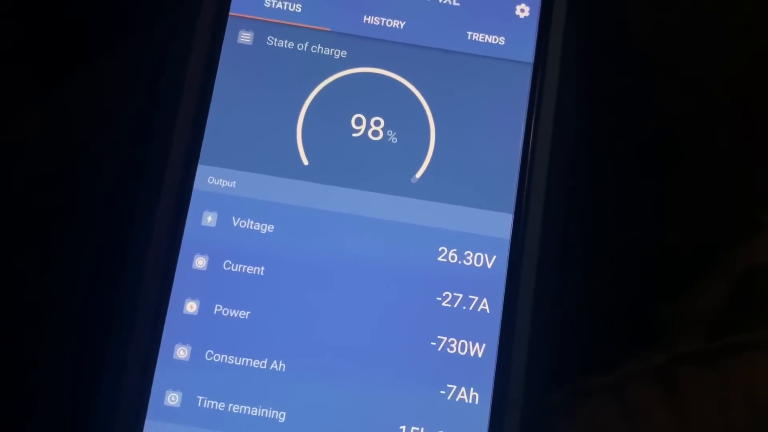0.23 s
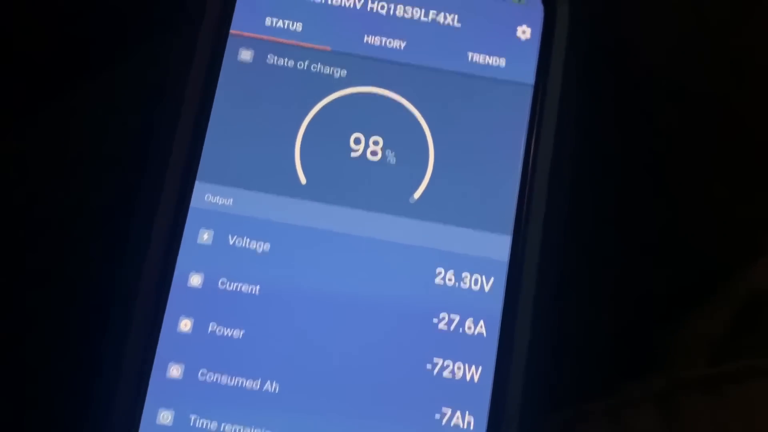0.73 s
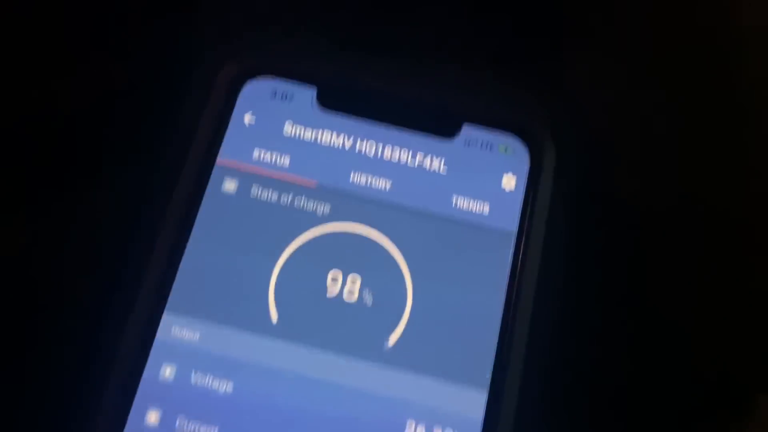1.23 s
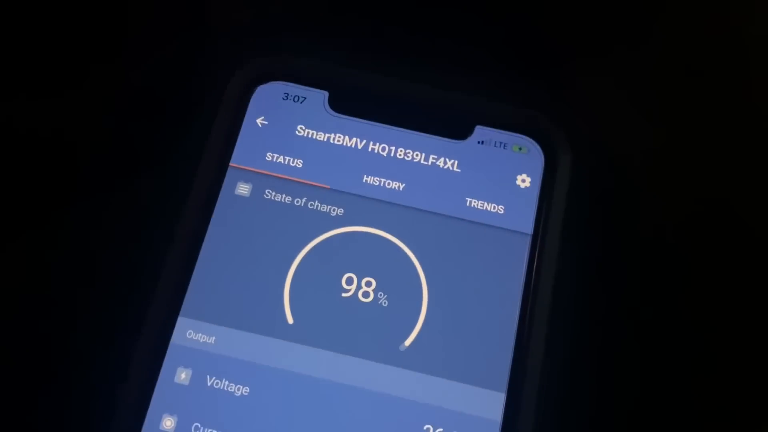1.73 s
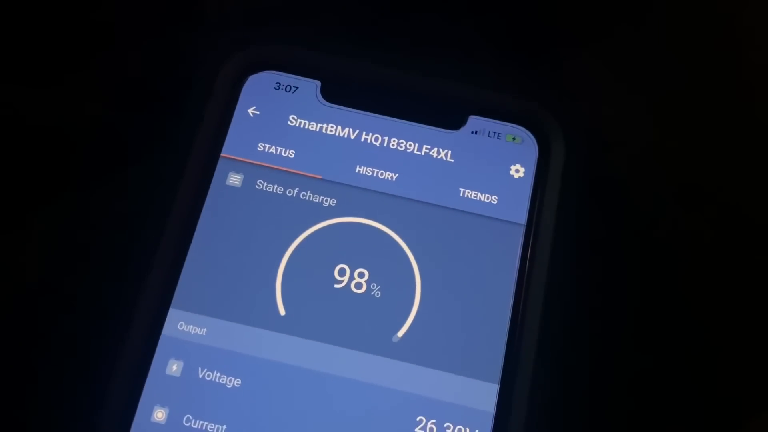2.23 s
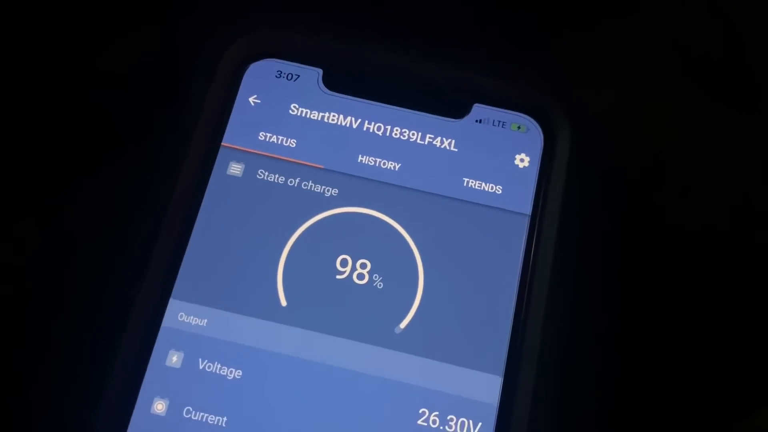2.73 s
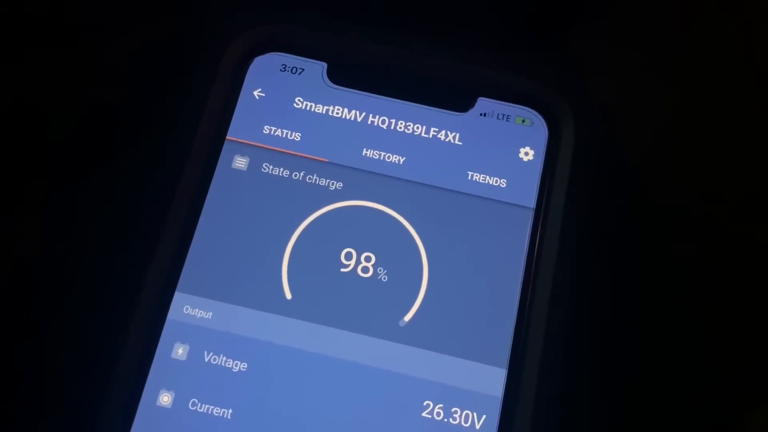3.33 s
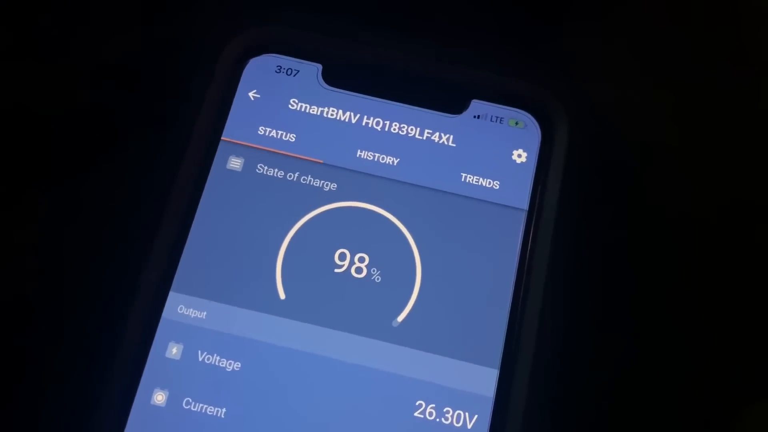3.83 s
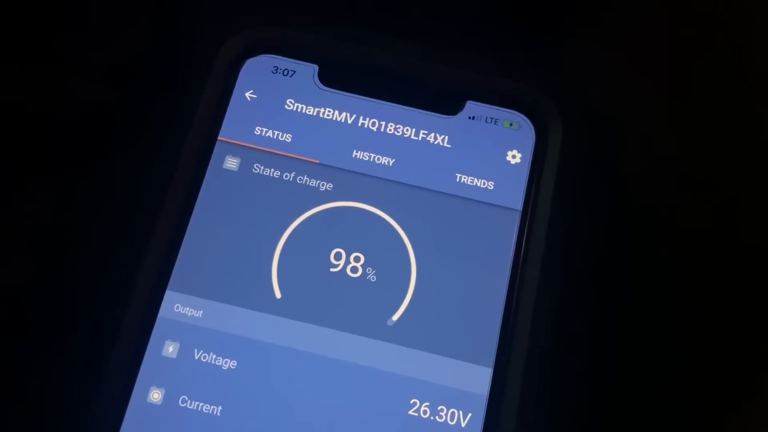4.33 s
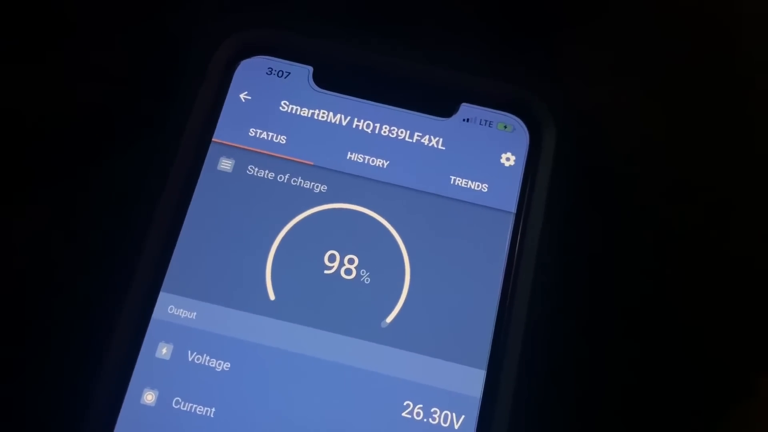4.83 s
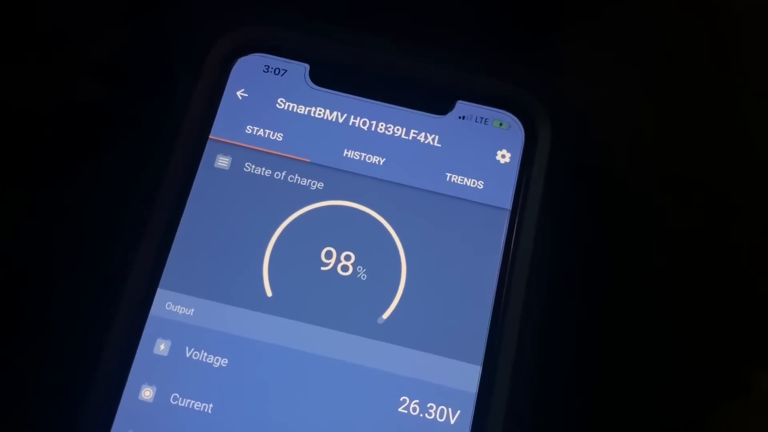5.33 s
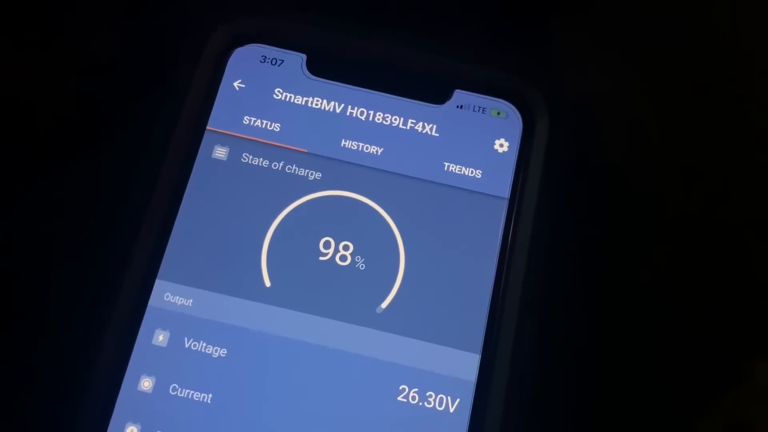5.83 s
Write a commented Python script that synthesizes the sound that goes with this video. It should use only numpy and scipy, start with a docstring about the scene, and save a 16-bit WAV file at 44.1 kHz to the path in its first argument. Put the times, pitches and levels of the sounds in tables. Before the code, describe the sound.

Inside a parked vehicle at night, a rooftop air conditioner holds a steady deep hum with a rumbling blower and soft air rushing from ceiling vents. Around one second, fingers brush a phone case and a light tick is followed by a quick triple click, with faint thin whistles and hiss. Later come tiny high ticks and soft rustles near five seconds. The handheld stereo microphone is close to the hand.

```python
"""A rooftop air conditioner runs steadily above a parked vehicle: tones summed from shaft and mains multiples
stand in shaped blower noise, and duct-coloured noise rushes from the ceiling vents.
Around the first second a hand shifts on a phone: hiss, thin gliding whistles, brushing noise, and a tick and
triple click of noise bursts and ringing modes. Between four and six seconds come two tiny high ticks,
soft rustles of band noise, and one more faint scrape."""
import sys
import numpy as np
from scipy import signal
from scipy.fft import rfft, irfft
from scipy.io import wavfile

SR = 44100
rng = np.random.default_rng(int(sys.argv[2]) if len(sys.argv) > 2 else 0)


def put_to_file(sound):
    """Save the sound as 16-bit audio at rate SR, in the file named by the first command-line argument."""
    columns = np.atleast_2d(sound).T  # one column per channel
    safe = np.clip(columns, -1, 1)
    whole_steps = np.round(safe * 32767)
    wavfile.write(sys.argv[1], SR, whole_steps.astype(np.int16))


N = 267687
T, HZ = np.arange(N) / SR, np.fft.rfftfreq(N, 1 / SR)  # time in s, spectrum frequencies in Hz

# phase between the two microphone ports: [f/Hz, lead of the left/rad]
PORT_LEAD = [(250, 0), (370, -.35), (460, -1.5), (820, -1.55), (925, -.9), (1020, -1.45), (1300, -1.8),
             (1450, -3.6), (1580, -5.4), (1670, -3.6), (1750, -3.7), (1840, -1.7), (1950, -3.2),
             (2200, -3.5), (2300, -4.5), (2550, -5.2), (2850, -4.6), (2980, -2.8), (3450, 0), (3700, .5),
             (4000, -.4), (4600, -.9), (12000, 0)]


def machine(slip_cycles=.004, waver_db=1.0):
    """Rotating machinery and magnetic hum: lines at sums of shaft and mains multiples, sidebands included."""
    shaft_hz, mains_hz = 58.23, 60.005
    # tones: [multiple of the shaft rate, multiple of the mains rate, level/dB, left minus right/dB]
    tones = [(1, 0, -39.5, 1), (2, 0, -52, 0.5), (0, 2, -38.5, 1), (-1, 4, -57, 1), (0, 4, -46.5, 1),
             (1, 4, -58, 2), (0, 6, -67, 7.5), (12, 0, -69.5, -2.6), (16, 0, -78.5, -2), (18, 0, -74, -2)]
    shaft_turns = shaft_hz * T + slip_cycles * drift(1.0)  # the load nudges the rotor
    out = np.zeros((2, N))
    for shaft_order, mains_order, db, side_db in tones:
        k, m = round(shaft_order), round(mains_order)
        tone_hz = abs(k * shaft_hz + m * mains_hz)
        lag = np.array([[0], [read(PORT_LEAD, tone_hz)]])
        phase = 2 * np.pi * (k * shaft_turns + m * mains_hz * T + rng.random())
        level = amp(db + waver_db * drift(3.0))
        out += panned(side_db) * level * np.sqrt(2) * np.sin(phase - lag)
    return out


def blower(blade_hz=149.1, blade_db=-55, phase_wander_rad=0.25):
    """Turbulence gives a broadband rumble; the blades add a weak tone with wandering phase."""
    # rumble through the roof: [f/Hz, density/dB per Hz]
    rumble = [(22, -85), (27, -64.5), (40, -62), (55, -58), (63, -60), (88, -61), (102, -54), (120, -55.5),
              (148, -57.5), (182, -66), (218, -63), (255, -69), (305, -71.5), (420, -88)]
    blades = np.sqrt(2) * np.sin(2 * np.pi * blade_hz * T + phase_wander_rad * drift(1.0))
    roof_loss_db = 40 * np.log10(np.maximum(HZ / rumble[-1][0], 1))  # above the last table frequency
    return airborne(read(rumble) - roof_loss_db) + amp(blade_db) * blades


def vents(flutter_db=0.46, patchy_db=1.16):
    """Flow noise filtered by resonances: it flutters as a whole, and eddies stir single bands."""
    # air rushing from the vents: [f/Hz, density/dB per Hz]
    rush = [(200, -92.5), (380, -80.5), (560, -81.5), (800, -91.5), (1200, -96.5), (1650, -93),
            (2300, -100), (3400, -104.5), (4300, -116), (5200, -120.5), (7000, -122), (9700, -127),
            (12000, -124.5), (14300, -127), (15200, -133)]
    # resonances of duct and cabin that colour the air: [f/Hz, width/Hz, lift/dB]
    duct = [(452, 40, 2), (468, 25, -1.5), (543, 36, 3), (600, 41, -4.5), (641, 32, 4.5), (743, 20, 3),
            (786, 30, 2), (880, 56, -2), (936, 31, 3), (976, 35, 4), (1055, 33, 3), (1150, 40, 1.5),
            (1220, 61, 2), (1380, 37, 2.5), (1420, 53, 4.5), (1495, 23, -2), (1573, 46, 3), (1680, 68, 2.5),
            (1825, 70, 4.5), (1925, 30, -2.5), (2004, 68, 3.5), (2165, 100, 2.5), (2275, 55, -4.5),
            (2350, 170, 0.5), (2800, 72, -3), (3200, 82, 3.5), (3400, 90, 1.5), (3280, 120, -4),
            (3790, 220, -3.5), (3930, 190, 4), (4440, 200, -2), (6370, 350, 4), (6350, 200, -1.5)]
    lift_db = sum(db / (1 + (2 * (HZ - hz) / width_hz) ** 4) for hz, width_hz, db in duct)
    spectrum = rfft(airborne(read(rush) + lift_db))
    stirred = np.zeros((2, N))
    for shape, eddy in patches():
        stirred += irfft(spectrum * shape, N) * amp(patchy_db * eddy)
    return stirred * amp(flutter_db * drift(35.0))


def patches(patch_hz=500, rate_hz=14, count=8):
    """Independent modulation by band, with steady treble above: yields (band shape, drift)."""
    place = HZ / patch_hz
    for k in range(count):
        yield np.maximum(1 - abs(place - k), 0), drift(rate_hz)  # overlapping triangles
    yield np.clip(place - count + 1, 0, 1), 0


def clicks(crack_db=14, cabin_db=-6.0, cabin_t60=0.15, ping_right_db=-18):
    """Impact excitation: a crack and rattle make snap and knock, ring body and edge; the cabin adds a tail."""
    # clicks of the phone in the hand:
    # [t/s, level/dB, rattle t60/s, knock against the snap/dB, body ring level/dB, edge ping level/dB]
    impacts = [(0.8198, -62.5, 0.0045, 11.5, -55, -55), (1.0567, -52, 0.008, 4, -37.5, -51),
               (1.0647, -59, 0.01, -1, -49.5, -47), (1.07, -52, 0.0126, -7, -50, -51)]
    # colour of the bright snap: [f/Hz, level/dB]
    snap_colour = [(1000, 2), (2500, -4), (3300, -3), (3800, 0.5), (4600, 7), (5500, -9), (6500, 0.5),
                   (9000, -10.5), (11000, -24), (13000, -30.5)]
    # colour of the dull knock: [f/Hz, level/dB]
    knock_colour = [(150, -0.5), (450, 10), (950, 0), (1700, 3), (2200, -2), (3000, -19.5), (5000, -27),
                    (8000, -37.5), (12000, -53)]
    # balance of snap and knock: [f/Hz, left minus right/dB]
    balance = [(2000, 1), (4500, 2), (7000, 0.5), (10000, 2), (13000, 1)]
    # modes of the phone's body: [f/Hz, level/dB, t60/s]
    body = [(300, 3, 0.04), (453, 0, 0.022), (850, -3.5, 0.018), (1070, -7, .012), (1510, -9, 0.01),
            (2150, -16, .01), (3220, -13, 0.0046), (4650, -19.5, .014)]
    # modes of the case edge, by the left port: [f/Hz, level/dB, t60/s]
    case_edge = [(8100, -2, .025), (8340, -1.5, .015), (8750, 1.5, 0.01)]
    snaps, knocks = np.zeros((2, 2, N))
    for s, db, t60, knock_db, *_ in impacts:
        blow = rng.standard_normal((2, N)) * dying(s, t60)
        blow[:, round(s * SR)] = amp(crack_db)
        snaps += amp(db) * blow
        knocks += amp(db + knock_db) * blow[0]  # the same in both ports
    bursts = causal(snaps, snap_colour) + causal(knocks, knock_colour)
    out = irfft(rfft(bursts) * panned(read(balance)), N)
    out += struck(body, [(s, body_db) for s, *_, body_db, _ in impacts])
    pings = struck(case_edge, [(s, ping_db) for s, *_, ping_db in impacts])
    out += pings * amp([[0], [ping_right_db]])
    t = T[:SR // 2]
    tail = rng.standard_normal((2, len(t))) * np.exp(-np.log(1000) * t / cabin_t60)
    tail /= np.linalg.norm(tail[0])
    return out + amp(cabin_db) * signal.fftconvolve(out, tail, axes=1)[:, :N]


def brush(peak_s=1.066, level_db=-63.5, attack_s=0.12, release_s=0.5, grain_db=2):
    """Friction noise of fingers on the case around the clicks, with a fine random grain of level."""
    # colour of the brushing: [f/Hz, level/dB]
    friction = [(800, -10.5), (1600, 1.5), (3000, -2.5), (4500, 1.5), (5400, -9), (6500, -5.5), (8000, -17),
                (14000, -21)]
    noise = coloured(rng.standard_normal((2, N)), friction)
    return noise * amp(level_db + grain_db * drift(250)) * swell(peak_s, attack_s, release_s)


def whistles(fuzz_hz=70, wobble_hz=110):
    """Frequency modulation: each tone arches and wobbles in pitch as it swells and fades in hazy noise."""
    # thin whistles: [t of the pitch crest/s, attack/s, release/s, top f/Hz, level/dB, haze against the tone/dB]
    arches = [(.41, 0.65, .9, 14250, -69, -5.5), (.87, .3, .7, 12600, -89, 8),
              (1.14, .25, 0.49, 14350, -84.5, -2.5)]
    # colour of the haze: [f/Hz, level/dB]
    haze_colour = [(9000, -41), (11500, -11), (13000, 1), (14200, 1), (15000, -9)]
    rise_hz_per_s, fall_hz_per_s = 12000, 8000  # slopes far from the crest
    crest_s, swell_lag_s = 0.073, 0.048  # rounding of the crest; loudness peaks just after it
    haze_spread = 2  # the haze rises and falls this many times more slowly than its whistle
    out = np.zeros(N)
    for s, attack_s, release_s, top_hz, db, haze_db in arches:
        slope = np.where(T < s, rise_hz_per_s, fall_hz_per_s)
        arch = top_hz - slope * (np.hypot(T - s, crest_s) - crest_s)
        pitch = np.maximum(arch + fuzz_hz * drift(500) + wobble_hz * drift(18), 0)
        peak_s = s + swell_lag_s
        tone = np.sin(2 * np.pi * np.cumsum(pitch) / SR) * swell(peak_s, attack_s, release_s)
        haze = coloured(rng.standard_normal(N), haze_colour)
        haze *= swell(peak_s, haze_spread * attack_s, haze_spread * release_s)
        out += amp(db) * (tone + amp(haze_db) * haze)
    return out


def hiss(level_db=-84.5, end_s=1.2, release_s=.5, side_db=11):
    """Stationary noise, stronger at left, holds while the hand shifts, then decays exponentially."""
    # colour of the hiss: [f/Hz, level/dB]
    colour = [(5000, -24.5), (7750, -15), (8100, 11), (8900, 2.5), (9700, -7.5), (10500, -18),
              (14000, -8.5), (15000, -15.5)]
    noise = coloured(rng.standard_normal((2, N)), colour) * panned(side_db)
    return noise * amp(level_db) * np.exp(-np.log(1000) * np.maximum(T - end_s, 0) / release_s)


def rustle(grain_db=0.6, side_db=4.5):
    """Friction of the grip: swelling bands of noise with a shared grain of level, stronger at left."""
    # soft rustles and scrapes: [t of the peak/s, attack/s, release/s, centre f/Hz, width/Hz, level/dB]
    scrapes = [(5.087, .02, 0.086, 2670, 1000, -65), (5.12, .12, 0.45, 5300, 1600, -76.5),
               (5.15, 0.32, 1.0, 2750, 1293, -68), (5.175, .3, .85, 3230, 486, -66.5),
               (5.735, .45, .3, 3230, 1100, -70)]
    swish = np.zeros((2, N))
    for s, attack_s, release_s, hz, width_hz, db in scrapes:
        swish += amp(db) * swell(s, attack_s, release_s) * band(hz, width_hz)
    return swish * amp(grain_db * drift(120)) * panned(side_db)


def ticks(centre_hz=13000, width_hz=2400, attack_s=.004, release_s=.1):
    """Short bursts of narrow-band noise: tiny high ticks of the grip, the same in both ports."""
    # faint high ticks: [t/s, level/dB]
    taps = [(4.377, -83), (5.085, -74)]
    envelope = sum(amp(db) * swell(s, attack_s, release_s) for s, db in taps)
    return band(centre_hz, width_hz)[0] * envelope


def airborne(density_db):
    """Partial coherence: noise of a given density, alike at two ports in the bass, less so in the treble."""
    # likeness of the ports: [f/Hz, coherence 0-1]
    likeness = [(250, .99), (340, .88), (415, .6), (530, .93), (600, .74), (680, .96), (800, .82),
                (900, .58), (1040, .92), (1250, .84), (1330, .4), (1500, .6), (1650, .4), (2000, .52),
                (2400, .66), (2650, .55), (2760, .25), (2920, .62), (3200, .35), (3650, .68), (4400, .58),
                (5000, .35), (9000, .1)]
    # balance of the ports: [f/Hz, left minus right/dB]
    tilt = [(250, 0), (380, 1.6), (500, -.8), (900, -1.8), (1300, 0.5), (1500, 1.2), (1650, -1.1),
            (1850, 2), (2220, 3), (2450, 0), (3400, 2.2), (4600, 1), (7000, 1.5), (12000, 0)]
    a, b = rfft(rng.standard_normal((2, N)))
    same = np.clip(read(likeness), 0, .984)
    right = (same * a + np.sqrt(1 - same ** 2) * b) * np.exp(-1j * read(PORT_LEAD))
    pair = np.array([a, right])
    return irfft(pair * panned(read(tilt)) * amp(density_db) * np.sqrt(SR / 2), N)


def struck(modes, hits):
    """Modal superposition: decaying sines ring once for each hit (s, level dB)."""
    out, t = np.zeros(N), T[:SR // 10]
    ring = sum(amp(db - 60 * t / t60) * np.sin(2 * np.pi * hz * t) for hz, db, t60 in modes)
    for s, db in hits:
        out[round(s * SR):][:len(t)] += amp(db) * ring
    return out


def band(hz, width_hz):
    """Resonant filtering: noise of unit rms in one broad band, independent in the two ports."""
    shape = 1 / (1 + (2 * (HZ - hz) / width_hz) ** 4)
    return evened(irfft(rfft(rng.standard_normal((2, N))) * shape, N))


def coloured(x, points):
    """Spectral shaping without phase shift, keeping the power of white noise."""
    return irfft(rfft(x) * evened(amp(read(points))), N)


def causal(x, points):
    """Minimum-phase filtering: no ringing ahead of the event, and the power of white noise is kept."""
    log_gain = np.log(evened(amp(read(points, abs(np.fft.fftfreq(N, 1 / SR))))))
    response = np.exp(np.conj(signal.hilbert(log_gain)))  # phase follows from the log gain
    return irfft(rfft(x) * response[:len(HZ)], N)


def drift(rate_hz):
    """Low-passed random fluctuation of unit rms, up to about the given rate."""
    return evened(irfft(rfft(rng.standard_normal(N)) * np.exp(-(HZ / rate_hz) ** 2), N))


def swell(s, attack_s, release_s):
    """Exponential growth and decay: rises 60 dB over the attack, peaks at s, falls 60 dB over the release."""
    return np.exp(-np.log(1000) * np.maximum((s - T) / attack_s, (T - s) / release_s))


def dying(s, t60):
    """Exponential decay: starts at once at s and falls by 60 dB in t60 seconds."""
    return (T >= s) * np.exp(-np.log(1000) * np.clip((T - s) / t60, 0, 10))


def panned(db):
    """Interaural-style level difference: left and right gains, split evenly in decibels."""
    return amp(np.array([db, -db]).reshape(2, -1) / 2)


def read(points, hz=HZ):
    """Interpolates a spectrum table along a logarithmic frequency axis."""
    f, value = np.transpose(points)
    return np.interp(np.log(hz + 1), np.log(f + 1), value)


def evened(x):
    """Power normalisation: scales to an rms of one."""
    return x / np.sqrt(np.mean(x ** 2) + 1e-30)


def amp(db):
    """Logarithmic level: decibels to amplitude gain."""
    return 10 ** (np.asarray(db) / 20)


def scene():
    """Linear superposition of the air conditioner overhead and the small sounds close by."""
    overhead = machine() + blower() + vents()
    close_by = clicks() + brush() + whistles() + hiss() + rustle() + ticks()
    return overhead + close_by


def record(dry, edge_hz=15200):
    """Band limitation: a brief fade at both ends, then a linear-phase low-pass."""
    faded = dry * signal.windows.tukey(N, .002)
    low_pass = signal.firwin(511, edge_hz, window=("kaiser", 9), fs=SR)
    return signal.oaconvolve(faded, low_pass[None], "same")


dry = scene()
out = record(dry)
put_to_file(out)
```